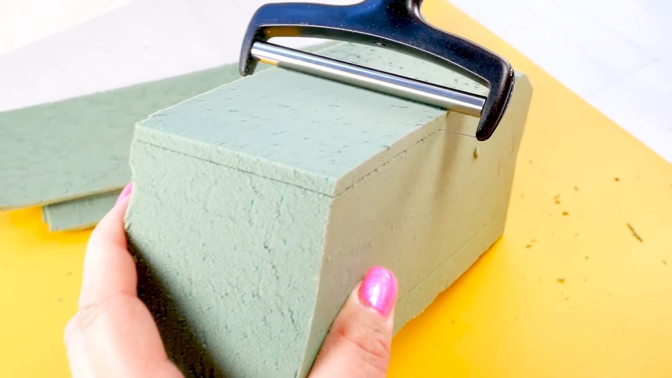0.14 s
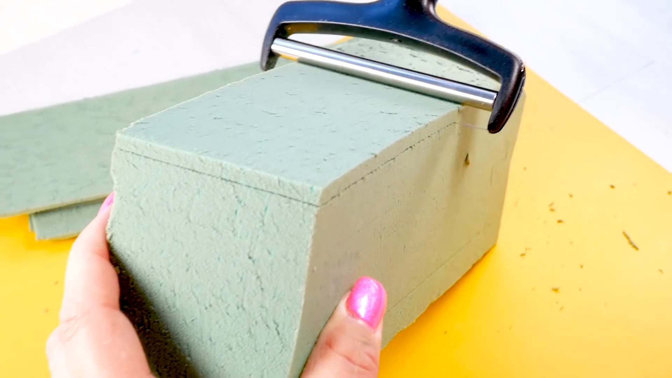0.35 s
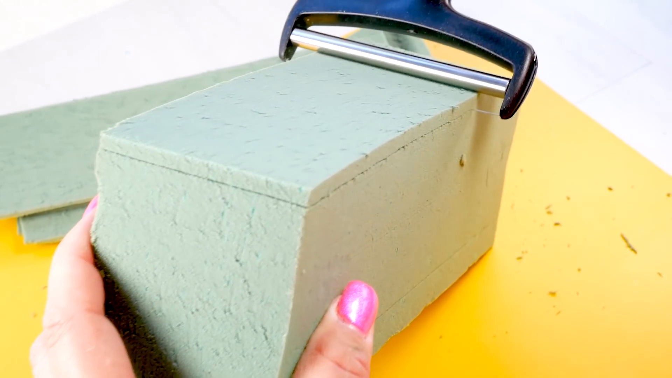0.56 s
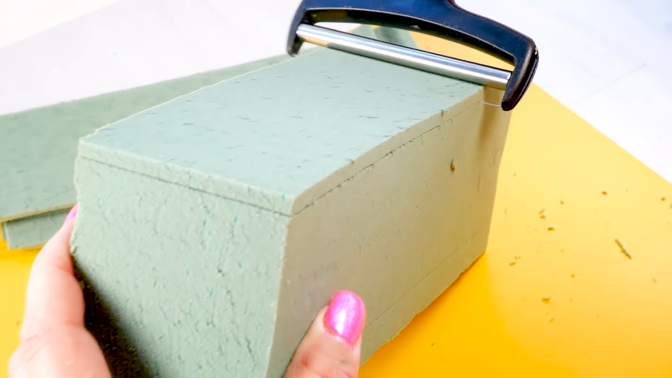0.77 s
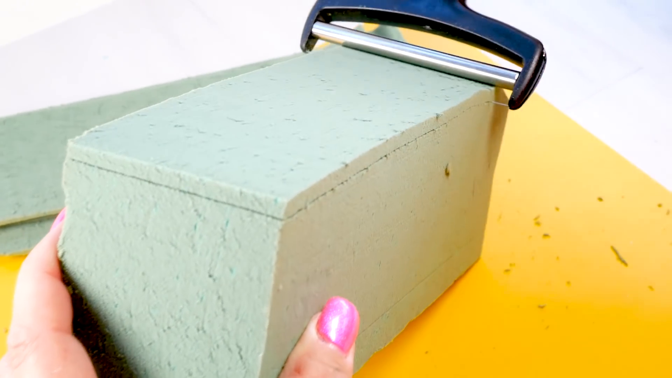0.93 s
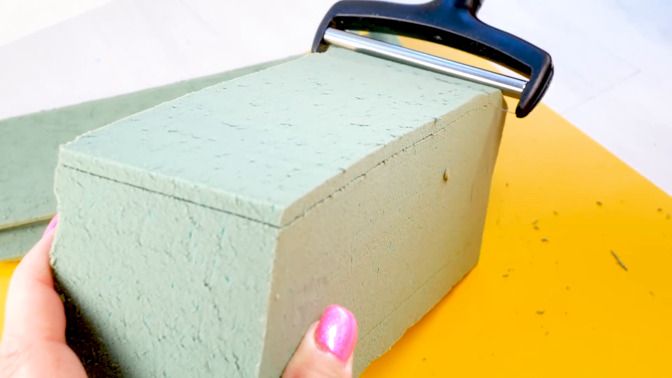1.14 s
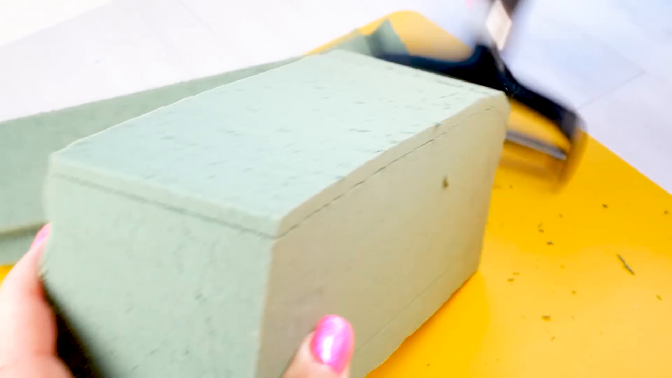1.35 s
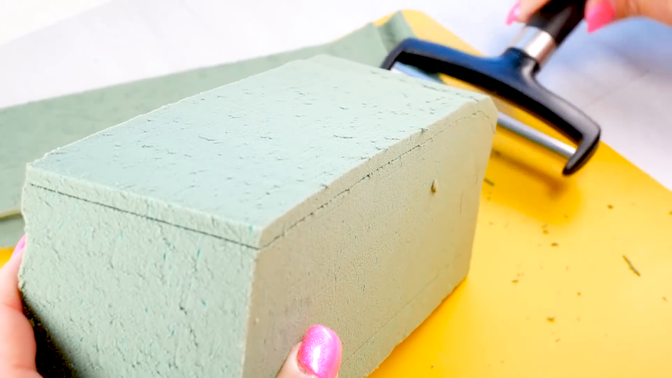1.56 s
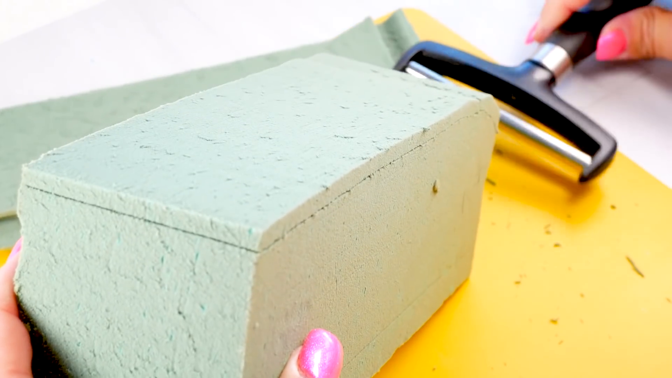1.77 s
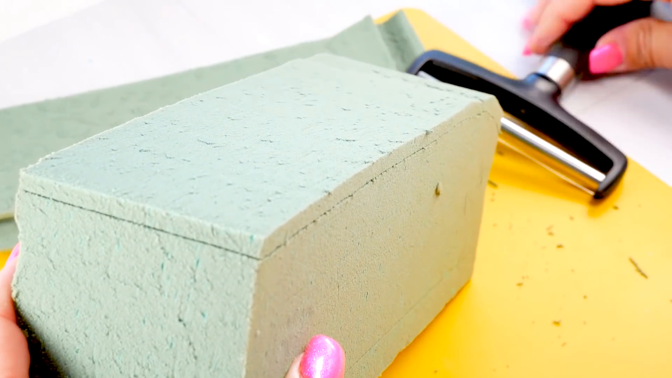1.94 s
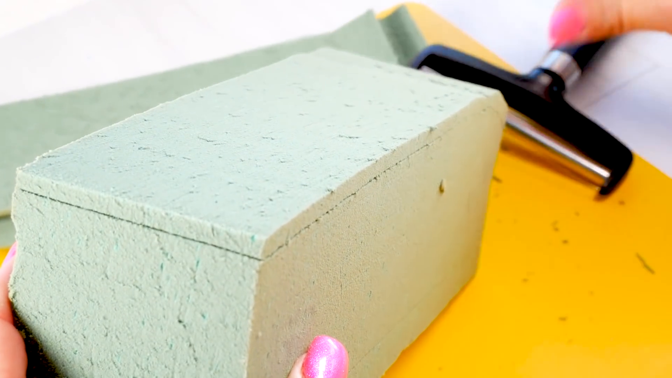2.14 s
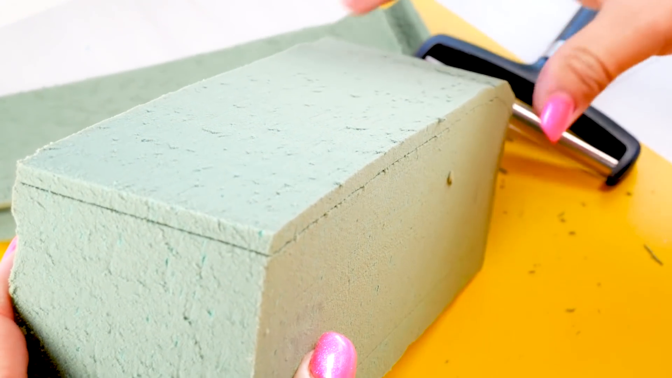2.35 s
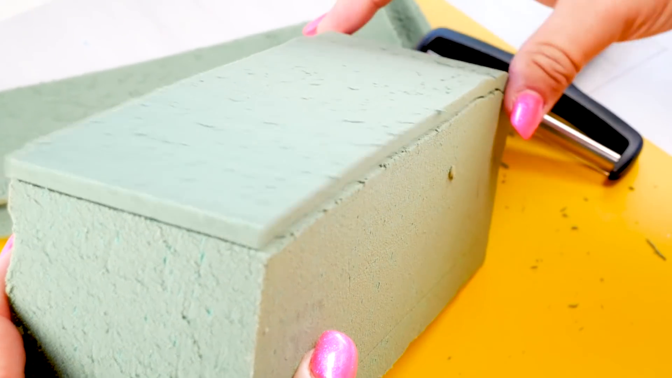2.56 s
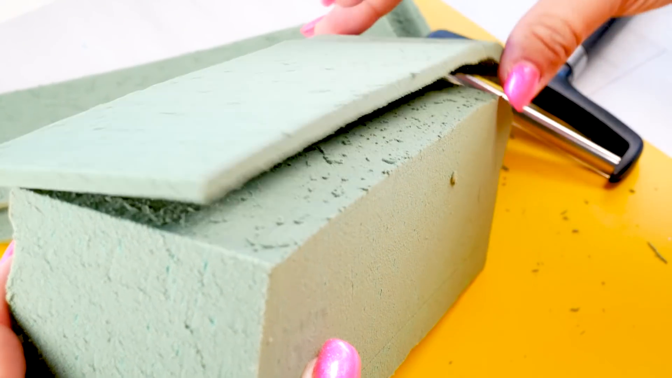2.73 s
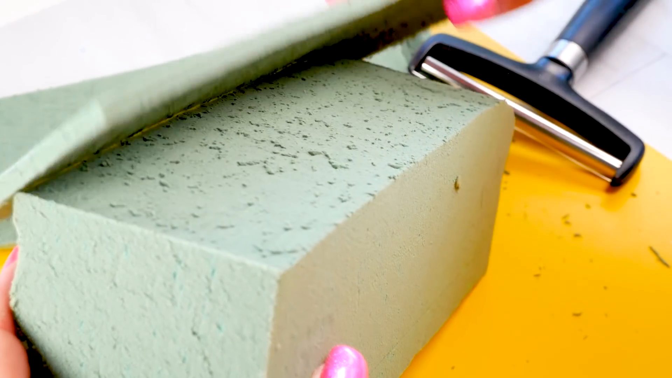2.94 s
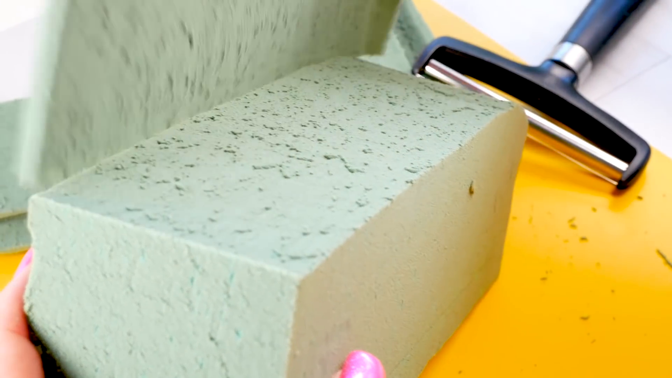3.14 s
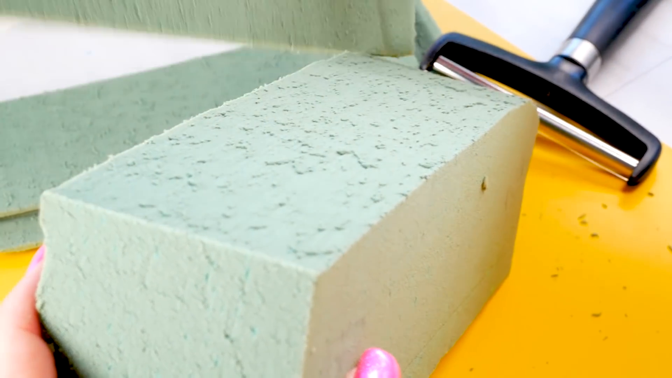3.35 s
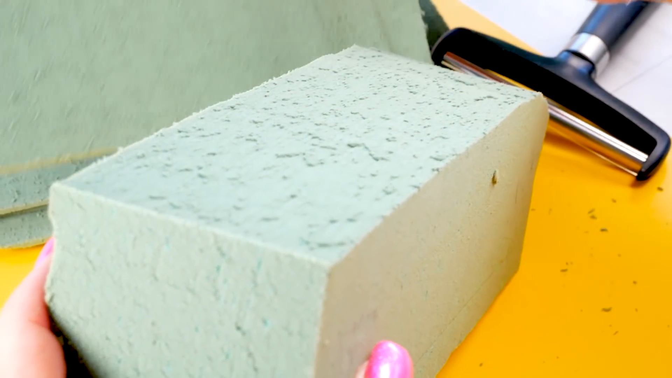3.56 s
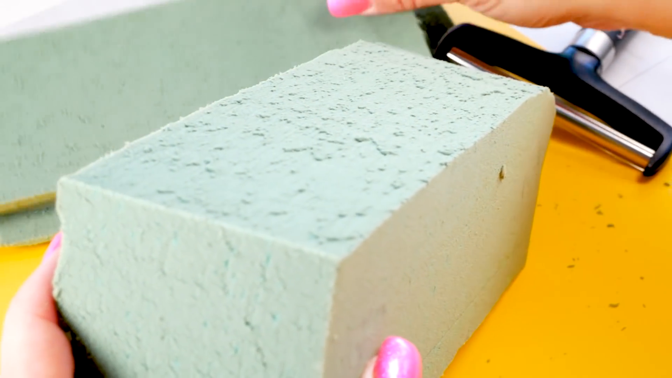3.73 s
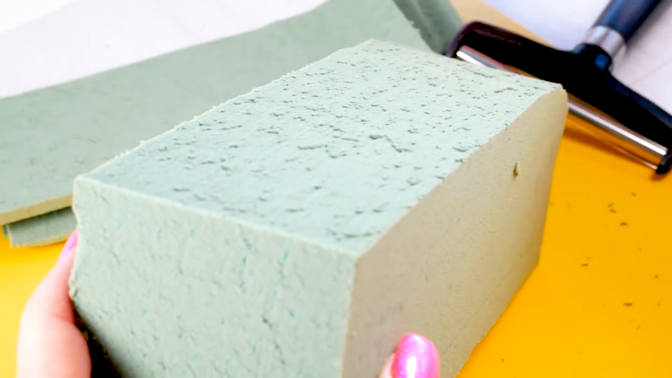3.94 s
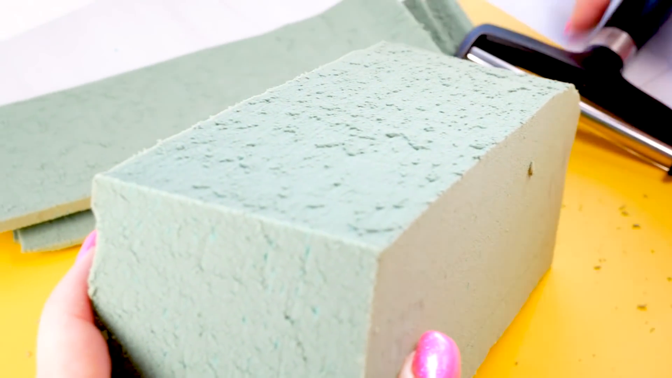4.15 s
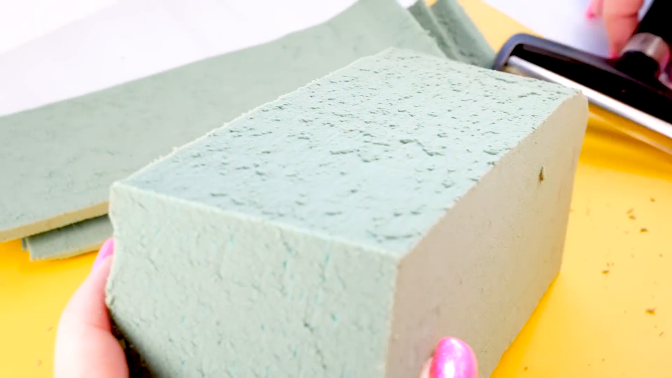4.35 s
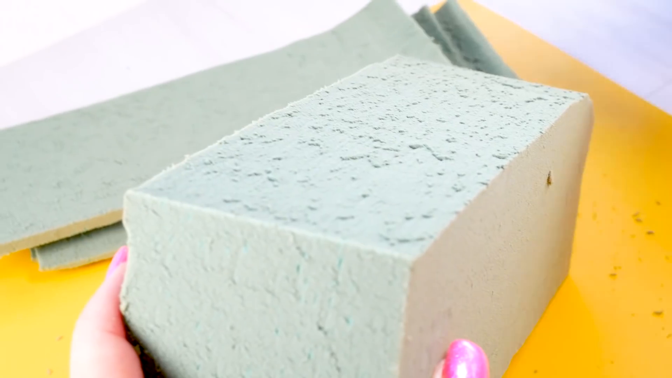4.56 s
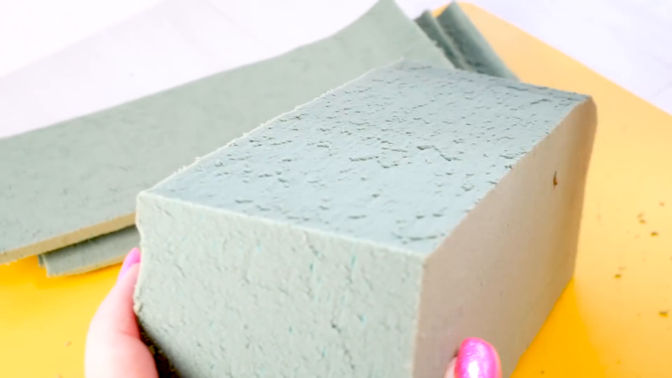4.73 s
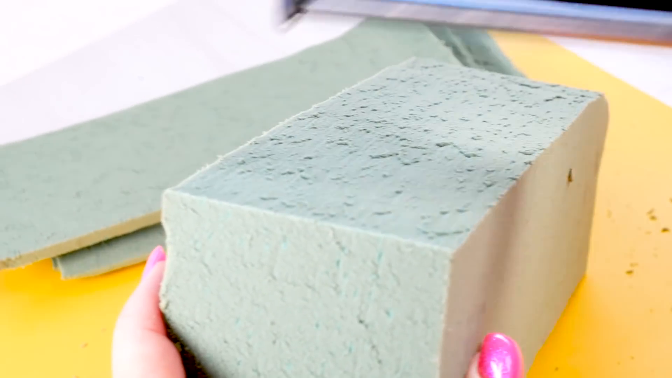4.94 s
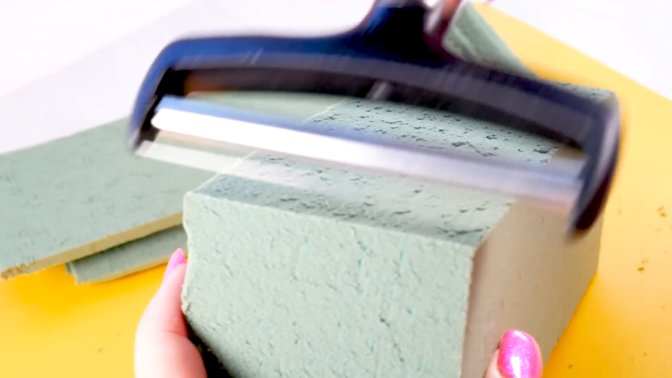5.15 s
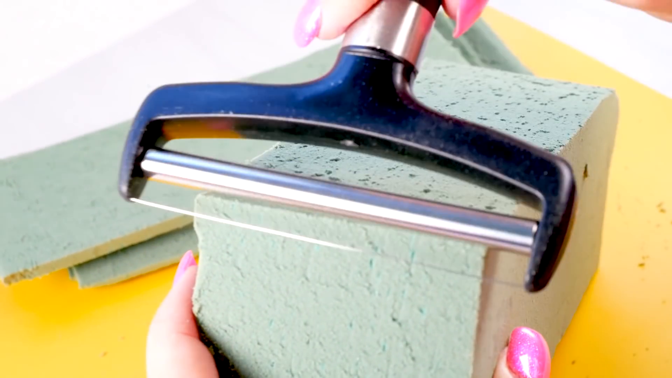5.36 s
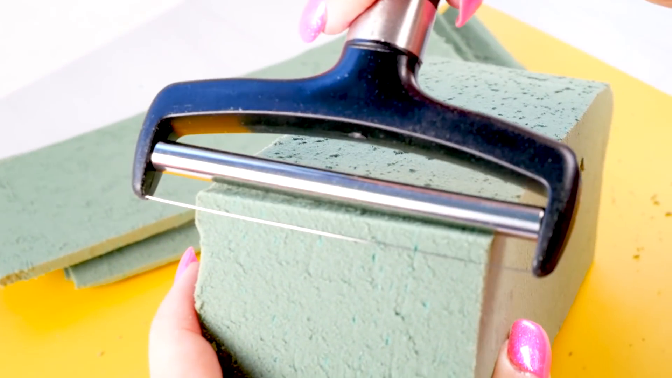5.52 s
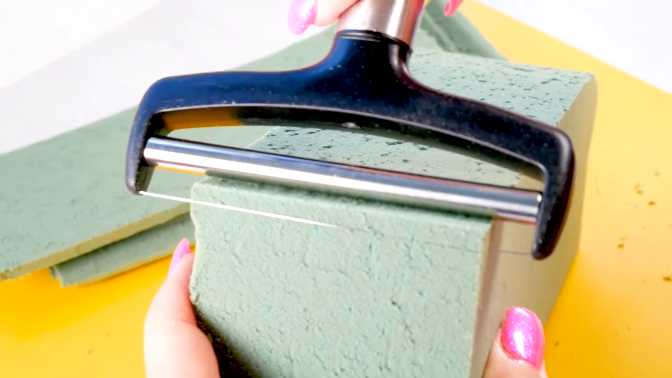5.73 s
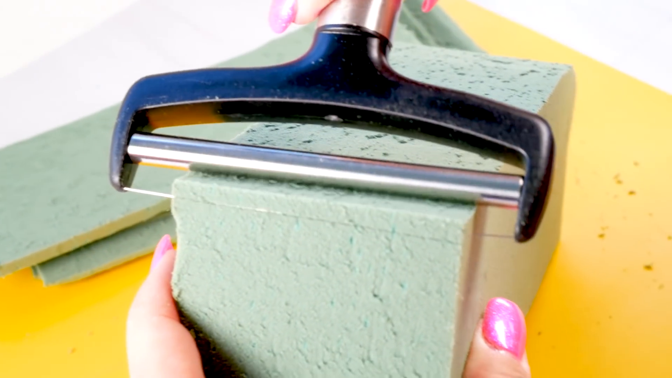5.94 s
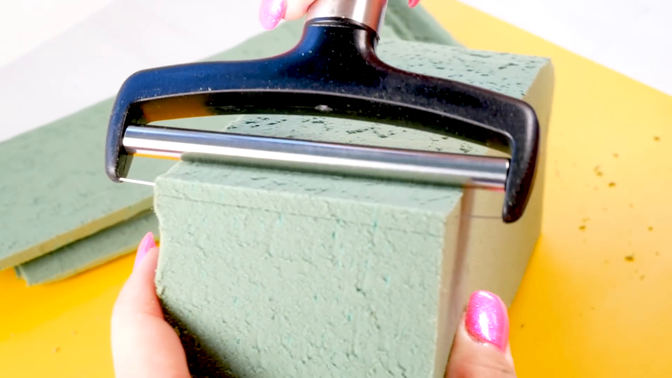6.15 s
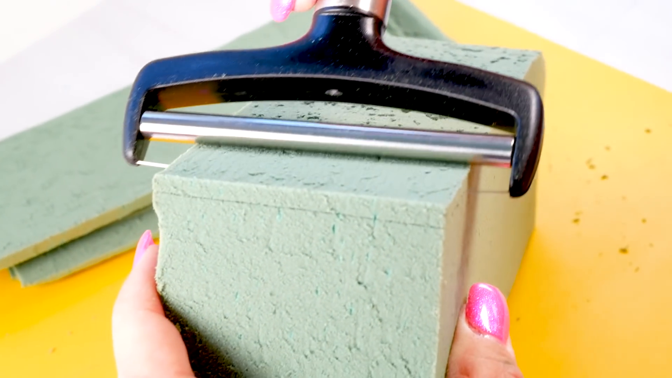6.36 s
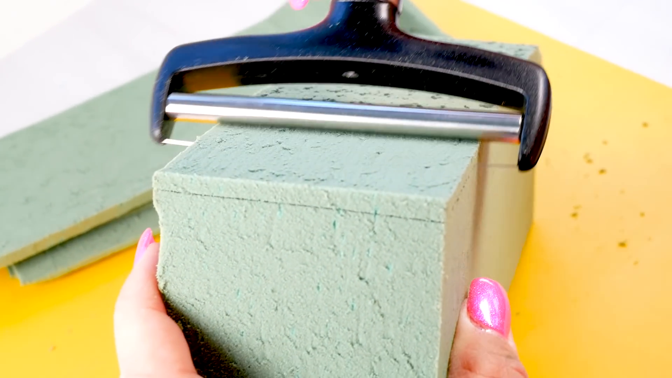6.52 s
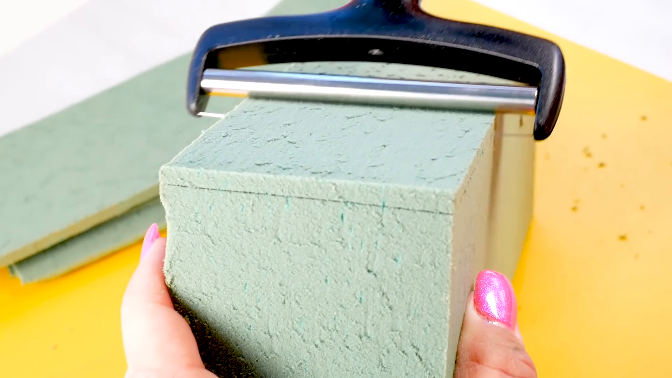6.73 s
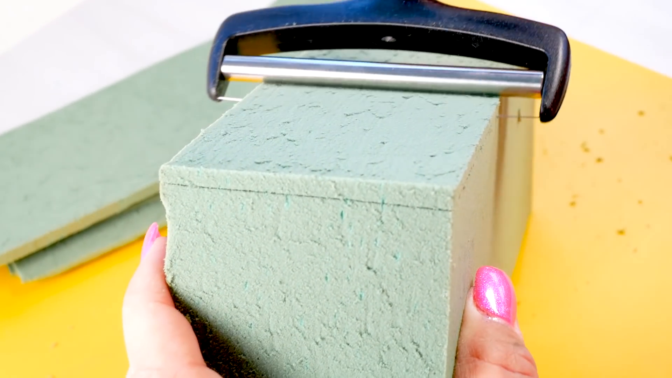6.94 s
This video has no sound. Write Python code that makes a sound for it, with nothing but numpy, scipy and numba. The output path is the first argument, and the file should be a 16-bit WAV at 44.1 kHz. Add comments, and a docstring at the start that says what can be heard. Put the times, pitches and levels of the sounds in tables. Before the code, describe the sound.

A taut wire rasps loudly through dry foam, snaps free with clicks, knocks hard on a mat, then soft rubbing precedes a second rasp.

```python
"""Wire slicer in dry foam

A wire is pulled through a block of foam: random cell cracks shake resonances and rasp with the pulling force.
It jumps free; the roller clinks and the frame knocks (struck decaying modes), with noise tails as table rattle.
The slicer slides and drops on a mat, the slice is lifted away, the slicer is picked up and set on the block again;
these rubs are cracks too, in other colours. Filtered-noise room tone and wavering mains hum lie below,
short feedback delays give the small room."""
import sys
import numpy as np
from scipy import signal
from scipy.io import wavfile
from numba import njit

SR = 44100
rng = np.random.default_rng(int(sys.argv[2]) if len(sys.argv) > 2 else 0)


def unload_audio(sound):
    """Save the sound as a 16-bit wav file, at the path given as the first command line argument."""
    columns = np.transpose(np.atleast_2d(sound))
    # keep every value between -1 and 1, then stretch to whole-number steps
    steps = np.round(np.clip(columns, -1, 1) * 32767)
    wavfile.write(sys.argv[1], SR, steps.astype(np.int16))


def volts(x):
    """Linear amplitude factor 10**(x/20) for a level x in dB, scalar or array-like."""
    e = np.asarray(x, float) / 20
    return 10 ** e


N = 312669

# pulling force on the wire, all tables read as one curve; the first table is the first cut, the last two the
# second cut, which steps at 5.686 s: (time [s], rasp level [dB])
PULLS = [
    [(0.0, -36.5), (0.172, -27), (0.21, -25.5), (0.248, -24), (0.318, -31.5), (0.35, -24), (0.538, -26),
     (0.556, -29), (0.65, -28.5), (0.668, -33), (0.752, -31), (0.878, -19.5), (0.93, -31.5), (1.02, -29.5),
     (1.098, -20.5), (1.192, -55.5), (1.272, -45.5), (1.342, -23), (1.402, -18.5), (1.412, -27),
     (1.43, -20), (1.566, -52.5), (1.68, -68)],
    [(5.46, -61.5), (5.49, -55), (5.504, -43.5), (5.578, -52), (5.644, -53.5), (5.684, -49)],
    [(5.689, -48.5), (5.929, -50), (5.953, -41.5), (6.023, -45), (6.031, -36.5), (6.109, -32.5),
     (6.159, -42.5), (6.171, -36.5), (6.219, -36), (6.231, -34.5), (6.269, -33.5), (6.363, -29),
     (6.421, -37), (6.483, -24.5), (6.549, -29.5), (6.659, -25.5), (6.699, -29.5), (6.757, -27.5),
     (6.917, -34.5), (7.007, -26.5), (7.09, -30.5)],
]
# how the wire sits in the foam, shallow is bright: (time [s], brightness [dB], pitch of the block's drone [Hz])
SEATING = [(0, 0.5, 577), (.5, 1, 683), (.62, 0, 510), (.75, -1.5, 480), (.86, 1, 800), (.98, -1, 685),
           (1.1, -1, 825), (1.22, 5.5, 700), (1.35, -1, 800), (1.42, 8, 800), (1.68, 4, 650),
           (5.33, 2.5, 654), (5.9, 7, 627), (6.1, 4, 750), (6.4, -1.5, 645), (6.5, -1, 755),
           (6.62, -2.5, 685), (6.82, -0.5, 510), (6.95, 0.5, 595), (7.09, 2, 564)]
# only the frame brushes the block, so drone and hiss drop: (time [s], loss [dB])
WIRE_OUT = [(1.4, 0.5), (1.5, 8), (5.6, 8), (5.684, 5.5), (5.689, 1.5)]
# rubs on the mat and of the lifted slice:
# (peak time [s], peak level [dB], rise [s], fall [s], brightness [dB])
MAT_RUBS = [(1.80, -47, 0.021, 0.28, -4), (1.917, -40, 0.096, 0.11, 1.5), (2.04, -52, .02, 0.057, -7.5),
            (2.1, -58, 0.092, 0.08, -20), (4.29, -53, 0.067, 0.11, 4), (4.346, -34.5, 0.046, 0.084, 3.5),
            (4.478, -43, 0.04, 0.065, 3), (4.525, -55.5, .02, .08, -19), (4.575, -67.5, 0.028, 0.069, -27),
            (4.726, -62, .02, 0.11, -8)]
LIFT_RUBS = [(2.55, -61.5, 0.0395, 0.19, -2.5), (2.68, -45.5, 0.085, 0.15, -5),
             (2.92, -40, 0.065, 0.29, -2.5), (3.03, -46.5, 0.14, 0.26, 2), (3.11, -44, 0.2, 0.1, -2.5),
             (3.21, -45.5, 0.071, 0.067, 2.5), (3.32, -48.5, 0.091, 0.24, 4.5), (3.45, -46, .15, .08, -0.5),
             (3.58, -53, .15, 0.19, -1.5), (3.745, -43.5, 0.084, 0.061, -1.5),
             (3.82, -51.5, 0.075, 0.071, -4.5)]
# colours of friction and of the room's air noise: (frequency [Hz], relative level per Hz [dB])
WIRE_IN_FOAM = [(70, -44), (100, -24), (135, -6), (388, -1), (850, -3), (1190, -4), (1470, -1.5),
                (2350, -4.5), (3700, 1), (4400, -7.5), (6500, -9.5), (9720, -8), (14200, -15),
                (15800, -25.5)]
FRAME_ON_MAT = [(120, -40), (200, -3), (633, -9.5), (719, -10), (880, -11), (1440, -9), (1700, -16),
                (3400, -12), (7610, -17.5), (12900, -14.5), (15800, -43.5)]
FOAM_ON_FOAM = [(120, -43), (200, -22), (263, -2), (423, -8), (760, -9), (929, -12), (2160, -5),
                (2840, -6.5), (9660, -6), (15800, -12.5)]
ROOM_TONE = [(18, -32), (30, -4), (69, -7.5), (103, -32.5), (169, -19.5), (232, -25), (265, -11.5),
             (318, -37.5), (392, -30.5), (496, -28), (537, -26.5), (717, -33.5), (1060, -36), (1310, -39),
             (15800, -51)]
# resonances of block and slicer under friction: (frequency [Hz], width [Hz], level [dB])
BODY_MODES = [(129, 6, -4), (486, 12, -9.5), (890, 130, -3), (1475, 92, -7), (1770, 600, 0.5),
              (3520, 450, -7), (5500, 37, -13.5), (9600, 690, -17.5)]
# left-right likeness of friction and of air noise: (frequency [Hz], correlation [-1..1])
FRICTION_LIKENESS = [(60, 0.95), (290, 1), (640, 1), (1410, 0.83), (3100, 0.86), (5000, 0.88), (8000, 0.97),
                     (9800, 0.97), (11500, 0.84), (15000, .75)]
ROOM_LIKENESS = [(60, 1), (130, 1.0), (290, 1), (640, 0.95), (1410, 1), (3100, 0.23), (6820, 0.59),
                 (15000, 0.97)]
# hum lines: (frequency [Hz], relative level [dB])
HUM_LINES = [(37.7, -65.5), (59.2, -55), (140.0, -66), (177.6, -67), (274.5, -64.5), (559.9, -69.5)]
# loose roller on its pins: (time [s], peak [dB], lift of the modes above 6 kHz [dB])
CLINKS = [(1.398, -15, -3), (1.422, -9, 7), (1.426, -22, 10), (1.442, -23, -16), (1.491, -25, -17),
          (1.979, -32, 2), (2.003, -49, 3), (4.34, -52, 0), (4.585, -57, 15), (5.348, -45, -8),
          (5.373, -39, -8), (5.398, -46, -15), (5.446, -44, -14), (5.5, -45, -10)]
# dry snaps of grit and foam: (time [s], peak [dB], band reference [Hz])
SNAPS = [(1.399, -19, 6000), (1.404, -15, 3480), (1.832, -46, 2840), (1.9116, -25, 3180),
         (1.9389, -25, 3000), (1.966, -18.5, 3000), (1.979, -31, 8930), (3.805, -41.5, 4020),
         (4.338, -25.5, 2620), (4.343, -26, 2600), (4.37, -26, 2600), (4.454, -43, 5000),
         (4.475, -28.5, 6860), (5.348, -40.5, 3000), (5.35, -39, 7000), (5.371, -32.5, 4000),
         (5.519, -38, 7000), (5.544, -30, 9000), (5.668, -28, 6000), (5.688, -28, 6500), (5.939, -35, 3500),
         (6.029, -20, 3000), (6.172, -27.5, 3000)]
# frame meets mat or block: (time [s], peak [dB], left minus right [dB], upper contact frequency [Hz])
KNOCKS = [(1.4235, -18, 2, 4000), (1.4407, -16, -3, 3920), (1.491, -26.5, -1, 4000),
          (1.706, -51, -0.5, 1700), (1.777, -38.5, -4.5, 3500), (1.9666, -6, -2.5, 2600),
          (1.9765, -12, -2, 2200), (1.9948, -6, -1.5, 2200), (2.006, -31.5, 1, 2500),
          (2.0145, -30, 8, 2500), (2.031, -25, 2, 4060), (4.517, -41, 4, 1100), (4.564, -40.5, 3, 700),
          (4.7247, -45, 7, 3000), (4.7535, -51, 0, 4020), (5.37, -36, 3, 3500), (5.3985, -42, 0, 3500),
          (5.4476, -41, 4, 3500), (5.502, -38, -4, 3000)]
# modes of slicer parts: (frequency [Hz], relative level [dB], t60 [s])
FRAME_MODES = [(136, -28.5, 0.3), (238.9, -31.5, .12), (359, -18, .09), (444, -16.5, 0.052),
               (536, -20, .05), (860, -26, 0.054), (1002, -16.5, 0.073), (1100, -20.5, 0.15),
               (1240, -11.5, 0.046), (1400, 1, .006), (1500, -13.5, .07), (1770, -14.5, .05),
               (2134, -19.5, 0.045), (2570, -16.5, .04), (3040, -17.5, 0.032), (3220, -19.5, 0.06),
               (3970, -12.5, .005)]
ROLLER_MODES = [(1485, -3, .13), (3300, 0, .03), (5055, -7, .14), (5165, -8, .18), (7262, -9, .12),
                (7800, -15, .12), (10110, -12, .05), (10380, -14, .07), (13015, 0, .12), (13340, -9, .17)]
# table after a knock: (low edge [Hz], high edge [Hz], peak re knock [dB], t60 [s])
TABLE_RATTLE = [(250, 1900, -19, 0.26), (1700, 3000, -22, 0.12), (3800, 4200, -38.5, .11)]

BAND_EDGES_HZ = 20 * 2 ** np.arange(0, 9.9, .25)
BAND_FILTERS = [signal.butter(2, band, "band", fs=SR, output="sos") for band in zip(BAND_EDGES_HZ, BAND_EDGES_HZ[1:])]
DRONE_HZ_PER_DB, PEAK_WANDER = 13.5, .05   # the drone's peak rises with force; share by which peaks stray
# the wire sticks and lets go, more so when shallow
SLIPS_PER_S, SLIP_DECAY_S, SLIP_DB, SLIP_DB_PER_BRIGHT_DB = 35, .012, 3, 1.16
RUB_FADE_DB, RUB_DRONE_HZ = 20, 800   # a rub is this far down after its rise or fall time
AIR_RMS_DB = -52
ROOM_T60_S, WALL_HZ, WET_DB = 0.16, 3000, -23.5   # treble dies sooner than the t60
TOP_HZ = 16600


def rms_one(x):
    """Scale to unit power."""
    return x / np.sqrt(np.mean(x ** 2) + 1e-20)


def at_hz(points, hz):
    """Read a spectrum on a log frequency axis."""
    points = np.array(points)
    return np.interp(np.log(hz), np.log(points[:, 0]), points[:, 1])


def drift(rate_hz, size):
    """Slow random wander of unit rms: low-passed noise, computed every 40 samples."""
    r = np.exp(-80 * np.pi * rate_hz / SR)
    noise = rng.standard_normal(size // 40 + 2002)
    slow = signal.lfilter([1], [1, -2 * r, r * r], noise)[2000:]   # settled part
    return np.interp(np.arange(size) / 40, np.arange(len(slow)), rms_one(slow))


def panned(left_right_db):
    """Left and right gains for a level difference."""
    return volts(np.array([left_right_db / 2, -left_right_db / 2]))


def band_pass(x, low_hz, high_hz):
    """Butterworth band."""
    return signal.sosfilt(signal.butter(2, [low_hz, high_hz], "band", fs=SR, output="sos"), x)


def ring(x, hz, t60_s):
    """A unit click sets a sine of initial height one ringing."""
    r, w = volts(-60 / (t60_s * SR)), 2 * np.pi * hz / SR
    return signal.lfilter([0, np.sin(w)], [1, -2 * r * np.cos(w), r * r], x + 1e-18)


def struck(modes, contact):
    """Every mode answers the contact with its own random sign and slightly random strength."""
    out = np.zeros(contact.size)
    for hz, db, t60_s in modes:
        strength = volts(db + rng.normal(0, 1.5)) * rng.choice([-1, 1])
        out += strength * ring(contact, hz, t60_s)
    return out


def add(out, time_s, sound, peak_db, pan_db):
    """Place a sound at its time, peak and side."""
    at = round(time_s * SR)
    gains = volts(peak_db) * panned(pan_db)[:, None]
    out[:, at:at + sound.size] += gains * sound / np.abs(sound).max()


def stereo_bands(source, spectrum, likeness, patchy_db, patch_hz):
    """Yield centre and coloured, wavering stereo of each band; source is (2 draws, mid and side, samples)."""
    for k, hz in enumerate(np.sqrt(BAND_EDGES_HZ[1:] * BAND_EDGES_HZ[:-1])):
        if hz < spectrum[1][0]:
            continue
        mid, side = signal.sosfilt(BAND_FILTERS[k], source[k % 2])   # neighbours use different draws
        alike = np.clip(at_hz(likeness, hz), 0, .993)
        gain = volts(at_hz(spectrum, hz)) * volts(patchy_db * drift(patch_hz, mid.size))
        mid = gain * np.sqrt(1 + alike) * mid
        side = gain * np.sqrt(1 - alike) * side
        yield hz, np.array([mid + side, mid - side])


def pulled(t):
    """Stick-slip pull of the wire: force [dB], brightness [dB], drone [Hz], loss of contact [dB]."""
    seat_s, bright_db, drone_hz = np.transpose(SEATING)
    bright_db = np.interp(t, seat_s, bright_db)
    lost_db = np.interp(t, *np.transpose(WIRE_OUT))
    jerks = (rng.random(t.size) < SLIPS_PER_S / SR) * rng.random(t.size)
    slips = signal.lfilter([1], [1, -np.exp(-1 / (SLIP_DECAY_S * SR))], jerks)
    depth_db = np.maximum(SLIP_DB + SLIP_DB_PER_BRIGHT_DB * (bright_db - lost_db), 0)
    force_db = np.interp(t, *np.concatenate(PULLS).T) + depth_db * (slips - slips.mean())
    return force_db, bright_db, np.interp(t, seat_s, drone_hz), lost_db


def cracking_cells(size, per_s, spread_db, clump_db):
    """Cells break at random, in clumps, with uneven sizes, and shake the body resonances."""
    breaks = rng.random(size) < per_s / SR
    sizes = volts(spread_db * np.minimum(rng.exponential(1, size), 5) + clump_db * drift(60, size))
    cracks = breaks * sizes * rng.standard_normal((2, 2, size)) + 1e-18
    out = cracks.copy()
    for hz, width_hz, db in BODY_MODES:
        r = np.exp(-np.pi * width_hz / SR)
        poles = [1, -2 * r * np.cos(2 * np.pi * hz / SR), r * r]
        out += volts(db) * signal.lfilter([(1 - r * r) / 2, 0, (r * r - 1) / 2], poles, cracks)
    return inside_block(out, t60_s=.07, echo_db=-8, shift_hz=8)


def inside_block(cracks, t60_s, echo_db, shift_hz):
    """Sound runs to and fro in the stiff foam: a fine mesh of modes that shifts with time."""
    t = np.arange(int(t60_s * SR)) / SR
    turn = drift(shift_hz, cracks.shape[-1])
    out = cracks.copy()
    for share in np.cos(turn), np.sin(turn):   # crossfade of two noise echoes
        echo = rng.standard_normal(t.size) * volts(-60 * t / t60_s)
        echo *= volts(echo_db) / np.sqrt(np.sum(echo ** 2))
        out += signal.oaconvolve(share * cracks, echo[None, None], axes=2)[..., :turn.size]
    return out


@njit
def moving_peak(x, hz, r, rate):
    """A two-pole resonance whose centre glides."""
    y = np.zeros_like(x)
    for side in range(2):
        for i in range(2, x.shape[1]):
            c = 2 * r * np.cos(2 * np.pi * hz[i] / rate)
            drive = (1 - r * r) / 2 * (x[side, i] - x[side, i - 2])
            y[side, i] = drive + c * y[side, i - 1] - r * r * y[side, i - 2]
    return y


def friction(spans_s, motion, spectrum, per_s, spread_db, clump_db, patchy_db, peak_db, pan_db, usual_db,
             drone, hiss, rasp_hz):
    """Cracks split into drone, rasp and hiss; force sets the rasp level and shifts the peaks."""
    # drone, hiss: (dB at usual force, dB per dB force, dB per dB brightness)
    # rasp_hz: (peak Hz, Hz per dB force, Hz per dB brightness)
    out, lead = np.zeros((2, N)), 2000   # lead-in samples let the filters settle
    for first_s, last_s in spans_s:
        start, end = int(first_s * SR), min(int(last_s * SR), N)
        t = np.arange(start - lead, end) / SR
        force_db, bright_db, drone_hz, lost_db = motion(t)
        extra_db = np.clip(force_db - usual_db, -9, 9)

        cracks = cracking_cells(t.size, per_s, spread_db, clump_db)
        parts = np.zeros((3, 2, t.size))
        for hz, sound in stereo_bands(cracks, spectrum, FRICTION_LIKENESS, patchy_db, 10):
            parts[np.searchsorted([1200, 4500], hz)] += sound

        drone_peak_hz = drone_hz + DRONE_HZ_PER_DB * extra_db
        rasp_peak_hz = np.clip(rasp_hz[0] + rasp_hz[1] * extra_db + rasp_hz[2] * bright_db, 1300, 3500)
        for part, hz, width_hz in ((0, drone_peak_hz, 120), (1, rasp_peak_hz, 250)):
            hz = hz * (1 + PEAK_WANDER * drift(4, t.size))
            parts[part] += volts(peak_db) * moving_peak(parts[part], hz, np.exp(-np.pi * width_hz / SR), SR)

        def part_level_db(base_db, by_force, by_bright):
            return force_db - lost_db + base_db + by_force * extra_db + by_bright * bright_db

        for part, level_db in zip(parts, (part_level_db(*drone), force_db, part_level_db(*hiss))):
            out[:, start:end] += (rms_one(part) * volts(level_db))[:, lead:]
    return out * panned(pan_db)[:, None]


def wire_cuts():
    """The taut wire breaks its way through foam cells."""
    return friction([(0, 1.7), (5.345, 7.1)], pulled, WIRE_IN_FOAM, per_s=9000, spread_db=1.0, clump_db=0.12,
                    patchy_db=0.0, peak_db=-1, pan_db=0.23, usual_db=-26,
                    drone=(-3.5, -.3, -.9), hiss=(0.6, -.3, .25), rasp_hz=(2450, -35, 5))


def room_tone():
    """Soft air noise, and mains hum as sines of wavering level and phase."""
    noise = rng.standard_normal((2, 2, N))
    air = sum(sound for hz, sound in stereo_bands(noise, ROOM_TONE, ROOM_LIKENESS, 0.93, 4.4))
    t = np.arange(N) / SR
    hum = np.zeros(N)
    for hz, db in HUM_LINES:
        level = volts(db + 1.0 + 2.0 * drift(4, N))
        hum += level * np.sin(2 * np.pi * hz * t + 1.6 * drift(4, N))
    return volts(AIR_RMS_DB) * rms_one(air) + hum


def click_and_time():
    """A unit click on a third of a second, and its time axis [s]."""
    t = np.arange(SR // 3) / SR
    return 1. * (t == 0), t


def roller_clinks():
    """The loose roller's modes ring from a click with a short noisy chatter."""
    out = np.zeros((2, N))
    click, t = click_and_time()
    for time_s, peak_db, high_db in CLINKS:
        chatter = click + .08 * rng.standard_normal(t.size) * volts(-60 * t / .03)
        modes = [(hz, db + high_db * (hz > 6000), t60_s) for hz, db, t60_s in ROLLER_MODES]
        add(out, time_s, struck(modes, chatter), peak_db, -1.5)
    return out


def dry_snaps():
    """Grit and foam snap: a click with a brief noise tail, band-passed."""
    out = np.zeros((2, N))
    click, t = click_and_time()
    for time_s, peak_db, hz in SNAPS:
        burst = click + 0.21 * rng.standard_normal(t.size) * volts(-60 * t / 0.014)
        add(out, time_s, band_pass(burst, hz * 0.82, min(hz * 2.0, 18000)), peak_db, -1.5)
    return out


def frame_knocks():
    """A soft contact strikes the frame modes; the table scatters the blow into a dense rattle."""
    out = np.zeros((2, N))
    click, t = click_and_time()
    for time_s, peak_db, pan_db, contact_hz in KNOCKS:
        scatter = rng.standard_normal(t.size)
        push = click + volts(-35) * scatter * volts(-60 * t / 0.071)
        add(out, time_s, struck(FRAME_MODES, band_pass(push, 110, contact_hz)), peak_db, pan_db)
        for low_hz, high_hz, rattle_db, t60_s in TABLE_RATTLE:
            swell_and_decay = np.minimum(t / 0.0087, 1) * volts(-60 * t / t60_s)
            tail = band_pass(scatter * swell_and_decay, low_hz, high_hz)
            add(out, time_s, tail, peak_db + rattle_db, pan_db)
    return out


def rubbed(rubs, t):
    """Rubs add their power, and each weighs on the brightness by its power."""
    peak_s, peak_db, rise_s, fall_s, bright_db = np.transpose(rubs)[..., None]
    late_s = t - peak_s
    fade_db = RUB_FADE_DB * np.maximum(late_s / fall_s, -late_s / rise_s)
    power = volts(2 * (peak_db - fade_db)) + 1e-30
    total = power.sum(axis=0)
    return 10 * np.log10(total), (power * bright_db).sum(axis=0) / total, RUB_DRONE_HZ, 0


def mat_slides():
    """The frame slides on the mat in uneven, clumped cracks."""
    return friction([(1.68, 2.25), (4.15, 4.9)], lambda t: rubbed(MAT_RUBS, t), FRAME_ON_MAT, per_s=7200,
                    spread_db=2.5, clump_db=2.6, patchy_db=0.0, peak_db=0.5, pan_db=-1.0, usual_db=-44.5,
                    drone=(-4.5, -.1, -1.0), hiss=(-12, -.1, .4), rasp_hz=(1700, -60, 120))


def slice_lift():
    """The slice rubs on the block in even, patchily coloured cracks."""
    return friction([(2.45, 4)], lambda t: rubbed(LIFT_RUBS, t), FOAM_ON_FOAM, per_s=9000,
                    spread_db=0.0, clump_db=0.5, patchy_db=2.0, peak_db=-14, pan_db=0.4, usual_db=-46,
                    drone=(-9, .1, -.2), hiss=(0.1, -.1, 1.0), rasp_hz=(2250, -10, 5))


def room(x):
    """Six feedback delays a side, duller on every round."""
    out, dull = np.zeros((2, N)), np.exp(-2 * np.pi * WALL_HZ / SR)
    lags = (rng.uniform(.008, .03, 12) * SR).astype(int)
    for k, lag in enumerate(lags):
        loop, gain, state = x.copy(), volts(-60 * lag / SR / ROOM_T60_S), [0.]
        for i in range(lag, N, lag):
            back, state = signal.lfilter([gain * (1 - dull)], [1, -dull], loop[i - lag:i], zi=state)
            loop[i:i + lag] += back[:N - i]
        out[k % 2] += (loop - x) * (-1) ** (k // 2)
    return signal.sosfilt(signal.butter(2, 450, "high", fs=SR, output="sos"), out)   # little bass comes back


def scene():
    """Cuts, rubs and knocks in a small room."""
    near = wire_cuts() + roller_clinks() + dry_snaps() + frame_knocks() + mat_slides() + slice_lift()
    return near + volts(WET_DB) * room(near.mean(axis=0)) + room_tone()


def top_cut(x):
    """Nothing passes above the cut-off."""
    return signal.sosfilt(signal.butter(12, 15970, fs=SR, output="sos"), x)


def record(dry):
    """A steep low-pass cuts the top, 60 dB down from TOP_HZ."""
    cut = signal.sosfilt(signal.cheby2(10, 60, TOP_HZ, fs=SR, output="sos"), dry)
    return top_cut(cut)


dry = scene()
out = record(dry)
unload_audio(out)
```